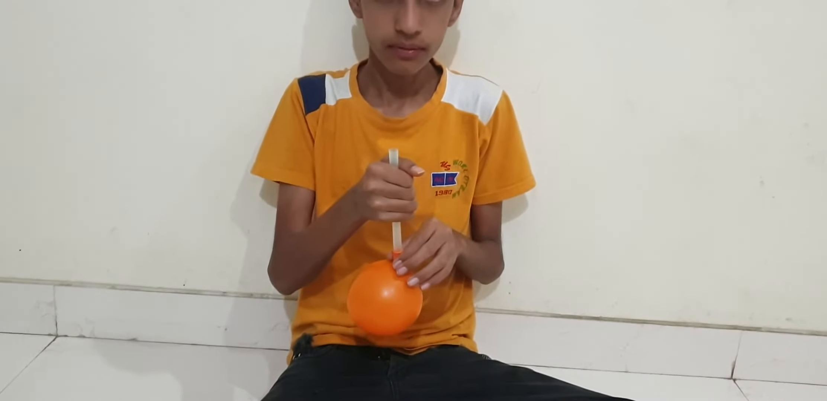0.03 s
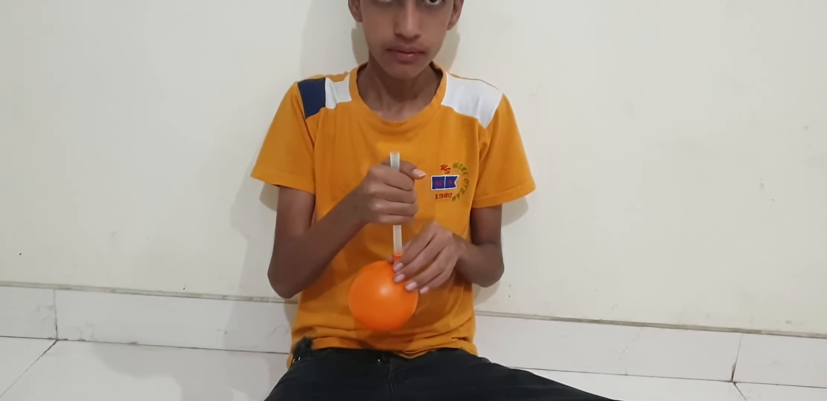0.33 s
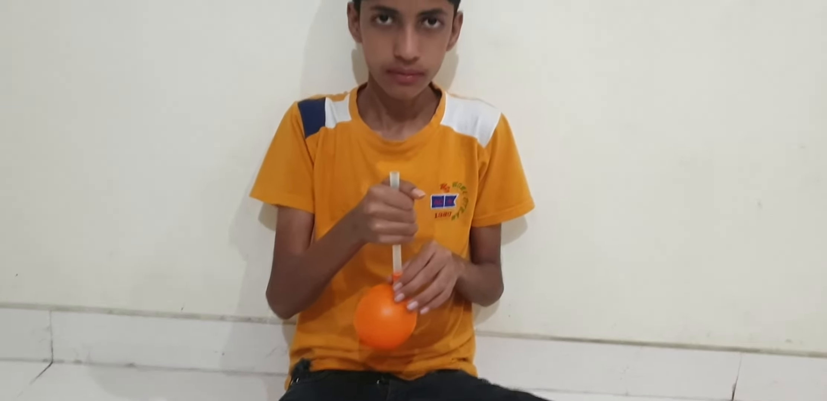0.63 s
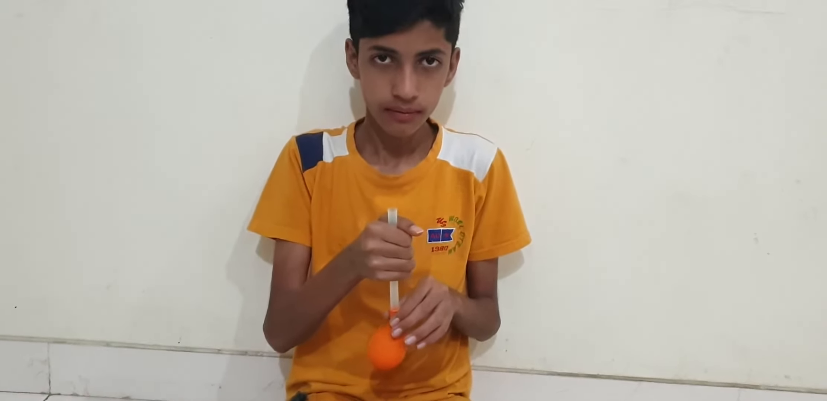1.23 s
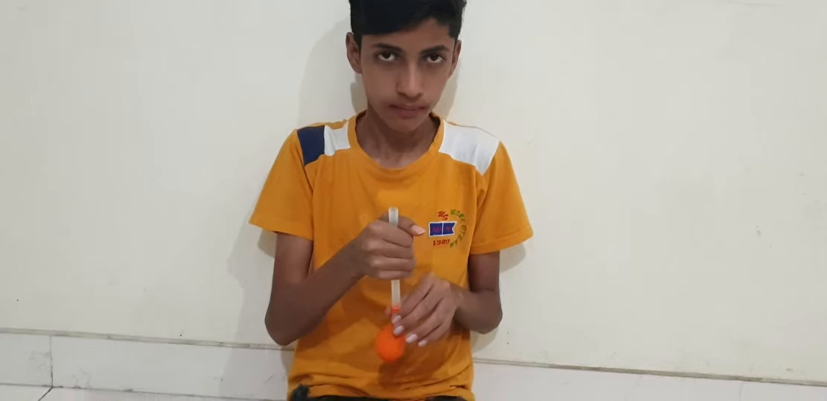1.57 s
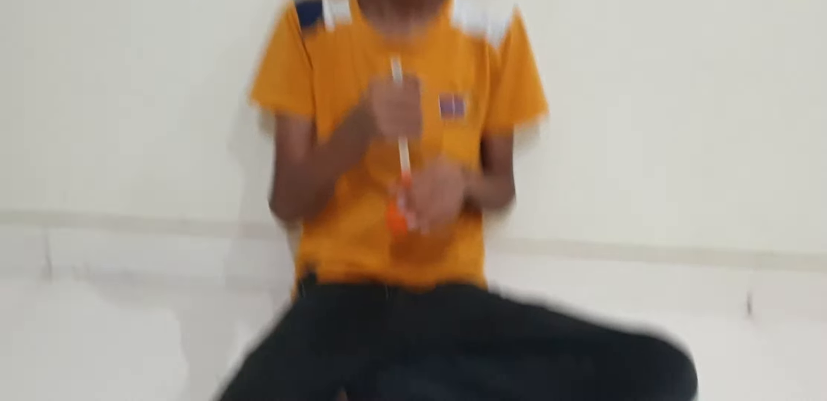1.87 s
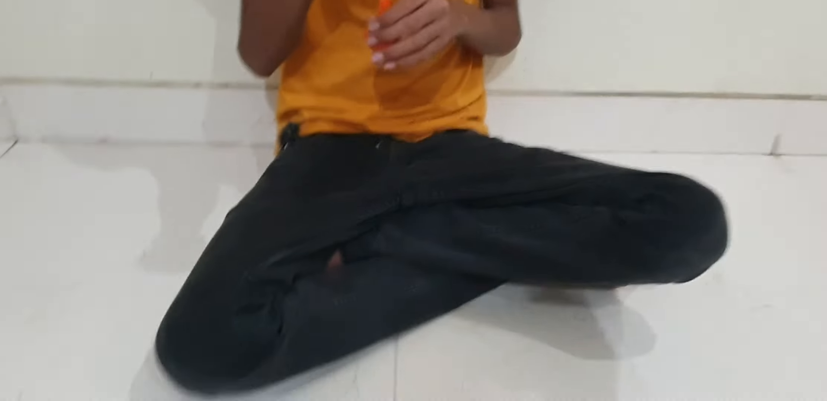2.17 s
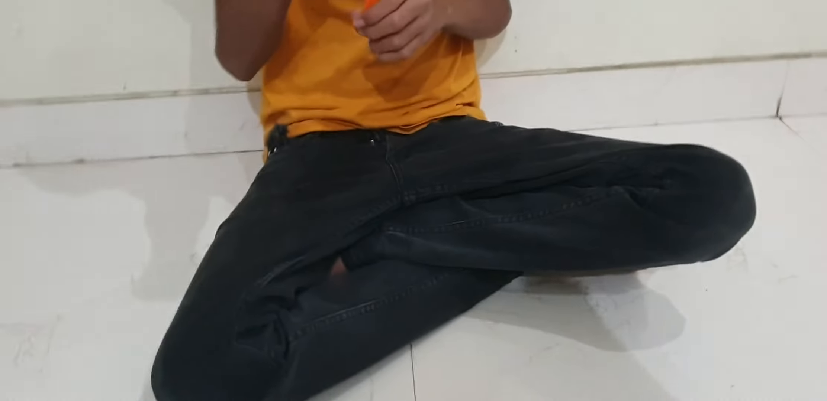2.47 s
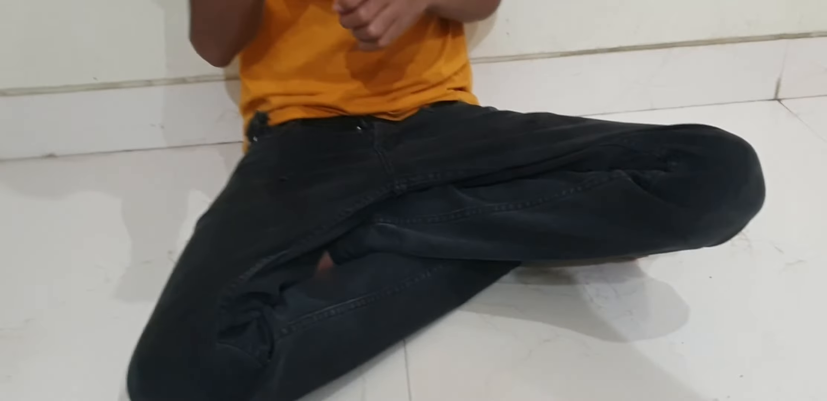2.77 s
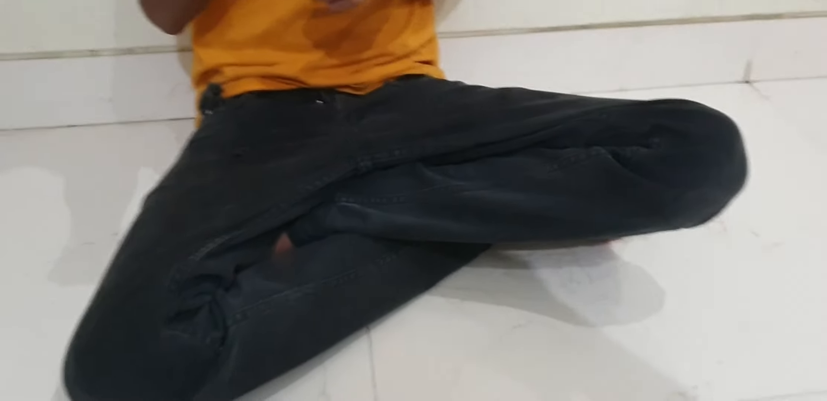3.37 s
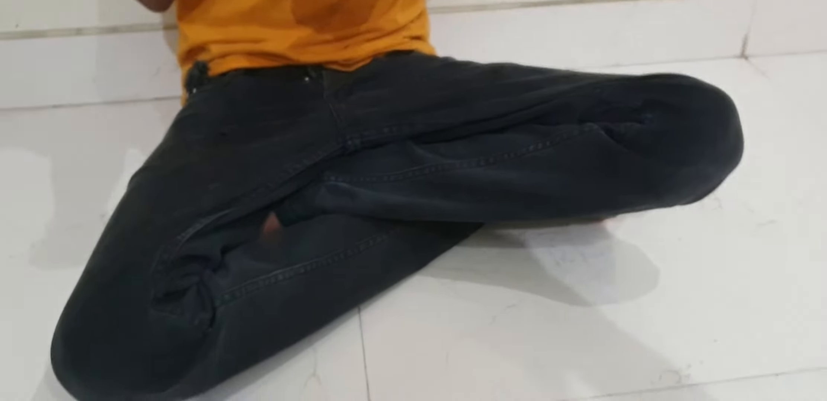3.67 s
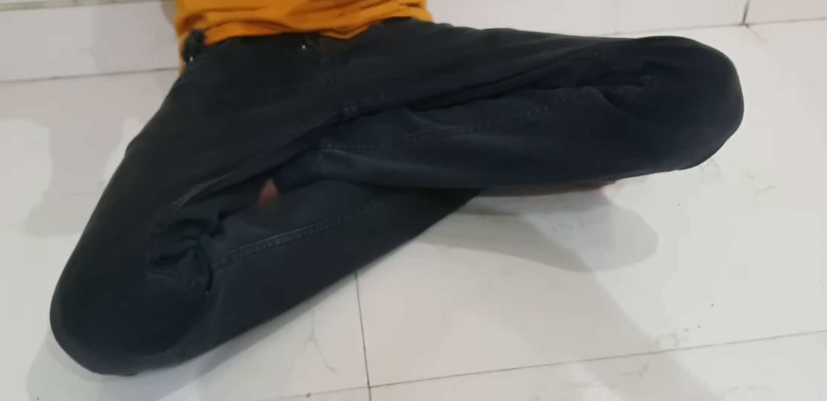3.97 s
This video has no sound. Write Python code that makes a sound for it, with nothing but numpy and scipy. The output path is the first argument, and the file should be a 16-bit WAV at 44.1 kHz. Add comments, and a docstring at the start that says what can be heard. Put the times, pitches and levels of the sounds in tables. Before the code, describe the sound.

A balloon empties through a tube with one loud, high horn blare that sags and stops, ringing briefly in a bare room. Then fingers knock, rub and creak on the microphone, much more quietly.

```python
"""A balloon empties through a tube: its rubber neck buzzes as a reed, a loud horn tone near 1 kHz.
The pitch creeps up as the balloon shrinks, then collapses with the last air, and the bare, hard-walled
room rings on. Afterwards fingers shift on the microphone case and touch the tube: knocks, rubbing,
a short groan, light taps and a stick-slip creak. A sleeve swishes, all over a faint noise floor."""
import sys
import numpy as np
from scipy import signal
from scipy.fft import rfft, irfft
from scipy.io import wavfile
from scipy.ndimage import uniform_filter1d

SR = 44100
rng = np.random.default_rng(int(sys.argv[2]) if len(sys.argv) > 2 else 0)


def store_wav(level_fs):
    """Save 16-bit WAV to argv[1]."""
    pcm = np.round(np.clip(np.atleast_2d(level_fs), -1, 1) * 32767)
    wavfile.write(sys.argv[1], SR, pcm.T.astype(np.int16))


N = 176400
TIME = np.arange(N) / SR
BLAST_END_S, CLOSE_S = 1.4507, 0.0066  # the airflow shuts off over CLOSE_S
ROOM_DB, CUTOFF_HZ = -2.5, 15750  # reverb against the direct tone; top of the whole mix


def balloon_horn():
    """The rubber reed's partials start smooth, then beat against their own echoes as the pitch glides."""
    # glide of the reed: time_s, pitch_hz
    pitch = [(0, 1000), (.22, 1001), (.55, 1004.5), (.75, 1008.5), (.95, 1015), (1.1, 1023), (1.23, 1032),
             (1.31, 1038), (1.35, 1031), (1.385, 1005), (1.408, 938), (1.426, 908), (1.44, 830),
             (1.453, 690)]
    # partials from the first up: offset_db (added to the level curve), pan_db
    partials = [(0.5, -2.5), (1, -11.5), (1.5, -11.5), (0, -17), (-1, -17), (-1, -16), (-4, -17.5),
                (-4.5, -14.5), (-11, -10.5), (-5.5, -3.5), (-3.5, -5.5), (-5.5, -7), (-11, -7), (-18, -8),
                (-18.5, -6)]
    # level curves of partials 1 to 5, and one for all above: time_s, level_db
    first = [(0.03, -35), (0.87, -26.5), (0.99, -28.5), (1.05, -22.5), (1.16, -23), (1.21, -28.5),
             (1.32, -32.5), (1.39, -22.5)]
    second = [(0.03, -34.5), (0.48, -38.5), (0.659, -24), (0.93, -30.5), (1.048, -27), (1.17, -29.5),
              (1.23, -18.5), (1.39, -23)]
    third = [(0.03, -25.5), (0.44, -27.5), (0.62, -36.5), (0.9, -36), (1.111, -27), (1.17, -37.5),
             (1.23, -28.5), (1.39, -28)]
    fourth = [(0.03, -29.5), (0.54, -21.5), (0.92, -23.5), (0.96, -30.5), (1.11, -26.5), (1.29, -34),
              (1.39, -26)]
    fifth = [(0.15, -29), (0.35, -42), (0.45, -27), (0.57, -23.5), (0.78, -36.5), (0.88, -27.5),
             (1.39, -24.5)]
    treble = [(0.03, -31), (0.55, -28.5), (0.76, -30.5), (1.39, -28)]
    # the fundamental's standing wave turns between the two microphone ports: time_s, left_lead_rad
    port_phase = [(.45, 0.82), (.7, 3.11), (1.1, 5.52)]
    collapse_s, collapse_db, sag_db = 1.385, 0.5, -5  # only the fundamental sags
    overtone_end_s, dulling_s = 1.4253, 0.017
    beat_start_s, beat_full_s = 0.73, 1.36
    steady_s, port_lag_s = 0.13, 0.00018
    preroll = SR // 2  # the room is already ringing at the start
    t = np.arange(-preroll, 5 * SR // 2) / SR
    slack = 0.43 + 1.14 * np.clip(t / BLAST_END_S, 0, 1) ** 2  # slacker rubber wavers more
    waver_hz = 0.76 * slack * drift(35, len(t))
    flutter_hz = 0.69 * drift(390, len(t))
    hz = curve(pitch, t) + waver_hz + flutter_hz
    phase = 2 * np.pi * np.cumsum(hz) / SR
    collapse = np.clip((t - collapse_s) / CLOSE_S, 0, 1)
    flow = np.clip((BLAST_END_S - t) / CLOSE_S, 0, 1) * from_db(collapse_db * collapse)
    glide = np.clip((t - beat_start_s) / (beat_full_s - beat_start_s), 0, 1)
    hold = np.clip(2 * (collapse_s - t) / steady_s, 0, 1)
    usual_power = (1 + from_db(ROOM_DB) ** 2) / 2
    low_levels = [first, second, third, fourth, fifth]
    out = np.zeros((2, N))
    for k, (offset_db, pan_db) in enumerate(partials, 1):
        if k <= len(low_levels):
            levels, base_send, window_s = low_levels[k - 1], 0.22, steady_s
        else:
            levels, base_send, window_s = treble, 1, 0.25  # the highs swell and fade more freely
        end_s = overtone_end_s + (BLAST_END_S - overtone_end_s) / k * 2  # upper partials die first
        envelope = flow * np.clip((end_s - t) / dulling_s, 0, 1) * from_db(sag_db * collapse * (k == 1))
        left_lead = curve(port_phase, t) if k == 1 else -2 * np.pi * k * hz[0] * port_lag_s
        stereo_phase = np.array([k * phase + left_lead, k * phase]) + rng.uniform(0, 2 * np.pi)
        direct = envelope * np.sin(stereo_phase)
        # echoes merge with a steady tone and part from it as it glides, sooner for high partials
        send = np.minimum(base_send + glide ** (2 / k), 1)
        echoes = signal.fftconvolve(direct * send, room_tail(k * hz[0]), axes=1)[:, :len(t)]
        heard = direct + echoes
        # ride the gain to hold the partial near its level curve until the collapse
        power = np.maximum(uniform_filter1d(heard ** 2, int(window_s * SR), axis=1), 1e-9)
        heard /= np.sqrt(usual_power * (power / usual_power) ** hold)
        heard *= from_db(offset_db + curve(levels, t)) * pan(pan_db)
        out[:, :len(t) - preroll] += heard[:, preroll:]
    return out


def room_tail(hz):
    """Hard walls return a dense stereo tail, dying at the room's rate for this frequency."""
    # decay of the room: frequency_hz, t60_s
    decay = [(1000, 0.59), (2000, 0.76), (4000, 0.62), (8000, 0.53), (11000, .43), (15000, 0.43)]
    first_echo_s = 0.007
    t = TIME[:SR]
    tail = rng.standard_normal((2, SR)) * from_db(-60 * t / at_hz(decay, hz)) * (t > first_echo_s)
    return tail * from_db(ROOM_DB) / np.sqrt(np.sum(tail ** 2, axis=1, keepdims=True))


def air_jet():
    """The jet hisses in the tube's resonances, growing as the balloon shrinks."""
    # colour of air rushing through the tube: frequency_hz, level_db
    spectrum = [(150, -29), (450, -10), (820, -1.5), (1300, -10.5), (1700, 1), (2300, -18), (2750, 4),
                (3300, -19), (3700, -1), (4350, -8.5), (4800, 8), (7000, 5), (9000, -3.5), (11500, -3),
                (15000, -11)]
    start_db, rise_db_per_s = -53.5, 3
    flow = np.clip((BLAST_END_S - TIME) / CLOSE_S, 0, 1)
    return flow * from_db(start_db + rise_db_per_s * TIME) * pan(-8.5) * noise(spectrum)


def knocks_and_creak():
    """Fingers knock on the case, and one sticks and slips in a creak whose ticks harden."""
    # knocks on the case: start_s, thud_db, thud_pan_db, tick_db, tick_pan_db
    knocks = [(2.060, -30, 26, -54, 14), (2.253, -47, 21, -41, 16), (2.333, -31, 14, -18.5, -12),
              (2.415, -28, 24, -27.5, -11), (2.997, -39.5, -14, -54, -10), (3.704, -32.5, -5, -50, -8),
              (3.726, -29, -22, -15.5, -23), (3.912, -34, 17, -51, 0), (3.933, -27, 18, -53, 0)]
    # slips of the creaking finger: start_s, level_db
    slips = [(3.092, -34.5), (3.105, -41), (3.115, -42.5), (3.128, -37.5), (3.136, -33.5), (3.158, -33.5),
             (3.175, -38), (3.188, -39), (3.198, -29), (3.218, -33), (3.238, -34), (3.255, -36.5),
             (3.269, -31), (3.284, -35), (3.293, -45), (3.302, -28.5), (3.314, -30), (3.324, -27.5),
             (3.335, -28.5)]
    harden_db_per_s, thud_pan_db, tick_pan_db = 22, -4, -20
    creak = [(s, db, thud_pan_db, db + 2 + harden_db_per_s * (s - slips[0][0]), tick_pan_db)
             for s, db in slips]
    return case_contacts(knocks + creak)


def case_contacts(contacts):
    """Each contact thuds in the case's modes and ticks at the microphone ports."""
    # modes of the case: frequency_hz, level_db, t60_s
    modes = [(105, -8.5, 0.047), (170, -6, 0.018), (275, -2.5, 0.0055), (560, -15, 0.012),
             (970, -6.5, 0.0014), (2500, -12.5, 0.0037)]
    thud_band_hz, port_time_s, tick_body_db = [55.74, 1440], 0.00045, 20
    kicks, ticks = np.zeros((len(modes), 2, N)), np.zeros((2, N))
    for start_s, thud_db, thud_pan_db, tick_db, tick_pan_db in contacts:
        i = int(start_s * SR)
        kicks[:, :, i] = from_db(thud_db + rng.normal(0, 2, (len(modes), 2))) * pan(thud_pan_db).T
        click = tick(tick_db)
        ticks[:, i:i + len(click)] += click * pan(tick_pan_db)
    kicks[:2] *= -1  # the two lowest modes swing against the rest
    thuds = sum(from_db(db) * ring(kick, hz, t60) for kick, (hz, db, t60) in zip(kicks, modes))
    ticks = dull_left_port(ticks + 1e-18)
    port_band_hz = np.array([.5, 2]) / (2 * np.pi * port_time_s)
    tick_body = from_db(tick_body_db) * bandpass(ticks + 1e-18, port_band_hz, order=1)
    return bandpass(thuds, thud_band_hz) + ticks + tick_body


def tick(db):
    """A short click: the lighter the contact, the duller its top."""
    db_per_octave = 8
    edge_hz = min(65000 * 2 ** (db / db_per_octave), CUTOFF_HZ)
    impulse = signal.unit_impulse(SR // 200)
    return from_db(db - 9.5) * signal.lfilter(*signal.butter(2, edge_hz, fs=SR), impulse)


def dull_left_port(x):
    """Touches on the case reach the left port without their top."""
    return np.array([signal.lfilter(*signal.butter(2, 5590, fs=SR), x[0]), x[1]])


def finger_rubs():
    """Skin slides on the case: a rumble through the body and a grainy hiss at the ports."""
    # finger strokes: start_s, end_s, rumble_db, rumble_pan_db, hiss_db, hiss_pan_db
    rubs = [(2.069, 2.115, -55, 14, -56.5, 26), (2.156, 2.242, -76, 15, -65, 24),
            (2.242, 2.285, -52.5, 17, -56.5, 11), (2.316, 2.359, -54, 2, -56.5, -30),
            (2.369, 2.483, -55.5, 9, -61.5, -7), (2.484, 2.584, -52.5, 12, -67.5, -6),
            (2.59, 3.068, -63.5, -11.5, -81.5, -17), (3.057, 3.275, -53, -3, -69, -23),
            (3.282, 3.342, -44, 0, -57.5, -6), (3.645, 3.669, -58.5, 17, -89, -14),
            (3.717, 3.892, -50.5, 7, -53.5, -29), (3.91, 3.944, -48, 8, -70, -15),
            (3.964, 3.984, -46, -9, -52, -26)]
    # colours of the body rumble and the skin hiss: frequency_hz, level_db
    rumble_spectrum = [(24, -35), (45, 2), (80, 2.5), (150, -3), (320, -10), (900, -20), (1600, -30),
                       (4000, -54)]
    hiss_spectrum = [(200, 6.5), (900, -0.5), (2500, 0), (4200, -2.5), (6500, -2.5), (9500, -5),
                     (15000, -1)]
    rumble_power, hiss_power = 0, 0
    for start_s, end_s, rumble_db, rumble_pan_db, hiss_db, hiss_pan_db in rubs:
        envelope = stroke(start_s, end_s)
        rumble_power += (envelope * from_db(rumble_db) * pan(rumble_pan_db)) ** 2
        hiss_power += (envelope * from_db(hiss_db) * pan(hiss_pan_db)) ** 2
    grain = rms_one(from_db(2.5 * drift(rate_hz=120)))
    rumble = np.sqrt(rumble_power) * noise(rumble_spectrum)
    hiss = np.sqrt(hiss_power) * grain * dull_left_port(noise(hiss_spectrum))
    return rumble + hiss


def finger_groan():
    """A dragging finger judders, its pitch sinking as it slows."""
    # judder of the finger: time_s, pitch_hz
    judder = [(2.43, 191.6), (2.49, 170), (2.53, 134), (2.57, 92.1)]
    hz = curve(judder, TIME) * (1 + 0.0347 * drift(rate_hz=63))
    phase = 2 * np.pi * np.cumsum(hz) / SR
    tone = np.sin(phase) + from_db(-10.5) * (np.sin(2 * phase) + .5 * np.sin(3 * phase))
    return tone * stroke(judder[0][0], judder[-1][0]) * from_db(-52.5) * pan(22)


def tube_taps():
    """Fingers touch the empty tube and its modes ring, light and hollow."""
    # taps on the tube: start_s, level_db
    taps = [(2.640, -55), (2.731, -56), (2.783, -54.5), (2.863, -54.5), (2.916, -52)]
    # modes of the tube: frequency_hz, level_db, t60_s
    modes = [(454, 0.5, 0.012), (1020, 0.5, 0.011), (2500, -13, 0.0056), (6500, -15, .003)]
    start_s, tap_db = np.transpose(taps)
    out = 0
    for hz, mode_db, t60 in modes:
        kicks = np.zeros(N)
        kicks[(start_s * SR).astype(int)] = from_db(tap_db + mode_db + rng.normal(0, 3.9, len(taps)))
        out += ring(kicks, hz, t60)
    return out * pan(12)


def sleeve_brush():
    """A sleeve brushes a shirt with a soft, dull swish."""
    # colour of the cloth: frequency_hz, level_db
    spectrum = [(60, -2.5), (600, -0.5), (3000, -26), (15000, -29.5)]
    envelope = stroke(start_s=3.39, end_s=3.416, attack_s=0.026, release_s=0.076)
    return noise(spectrum) * envelope * from_db(-55.5) * pan(-7.5)


def noise_floor():
    """Quiet room air, with faint electronic whines mostly on the right."""
    # colour of the room air: frequency_hz, level_db
    spectrum = [(20, -24.5), (70, 1), (160, -7.5), (350, -10), (800, -11.5), (1400, -23), (3500, -29.5),
                (9000, -32), (15000, -35.5)]
    # narrow whines: centre_hz, width_hz, level_db
    whines = [(4960, 490, -83.5), (6023, 390, -84), (14920, 220, -82)]
    out = from_db(-74) * noise(spectrum)
    for hz, width, db in whines:
        whine = bandpass(rng.standard_normal(N), [hz - width / 2, hz + width / 2])
        out += from_db(db) * pan(-20) * rms_one(whine)
    return out


def from_db(db):
    """Decibels to gain."""
    return 10 ** (np.asarray(db) / 20)


def rms_one(x):
    """Scale to unit rms."""
    return x / np.sqrt(np.mean(np.abs(x) ** 2) + 1e-20)


def curve(rows, t):
    """Straight lines through (time_s, value) rows."""
    return np.interp(t, *np.transpose(rows))


def at_hz(rows, hz):
    """Read (frequency_hz, value) rows on a log-frequency axis."""
    frequency, value = np.transpose(rows)
    return np.interp(np.log(np.maximum(hz, 1)), np.log(frequency), value)


def pan(pan_db):
    """Constant-power stereo gains; pan_db is left minus right."""
    return rms_one(from_db([[pan_db / 2], [-pan_db / 2]]))


def drift(rate_hz, size=N):
    """Smooth random motion, rms 1."""
    r = np.exp(-2 * np.pi * rate_hz / SR)
    return rms_one(signal.lfilter([1], [1, -2 * r, r * r], rng.standard_normal(size + SR))[SR:])


def noise(spectrum):
    """Stereo noise of a given colour, rms 1."""
    gain = from_db(at_hz(spectrum, np.fft.rfftfreq(N, 1 / SR)))
    return rms_one(irfft(rfft(rng.standard_normal((2, N))) * gain, N))


def bandpass(x, band_hz, order=2):
    """Roll off both sides of a band."""
    return signal.sosfilt(signal.butter(order, band_hz, "band", fs=SR, output="sos"), x)


def ring(kicks, hz, t60):
    """One mode: each kick starts a damped sine."""
    r, w = from_db(-60 / (t60 * SR)), 2 * np.pi * hz / SR
    return signal.lfilter([0, np.sin(w)], [1, -2 * r * np.cos(w), r * r], kicks + 1e-18)


def stroke(start_s, end_s, attack_s=0.022, release_s=0.017):
    """Envelope of a sliding touch: rise, hold and exponential release."""
    rise = np.clip((TIME - start_s) / attack_s + .5, 0, 1)
    return rise * np.exp(-np.maximum(TIME - end_s, 0) / release_s)


def scene():
    """The balloon's blast, then the handling, over the noise floor."""
    blast = balloon_horn() + air_jet()
    handling = knocks_and_creak() + tube_taps() + finger_rubs() + finger_groan() + sleeve_brush()
    return blast + handling + noise_floor()


def record(dry):
    """A steep low-pass cuts the very top."""
    return signal.sosfilt(signal.ellip(12, .1, 80, CUTOFF_HZ, fs=SR, output="sos"), dry)


dry = scene()
out = record(dry)
store_wav(out)
```